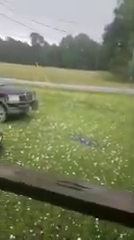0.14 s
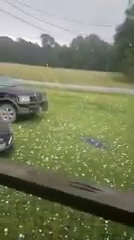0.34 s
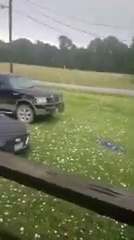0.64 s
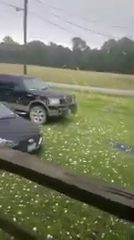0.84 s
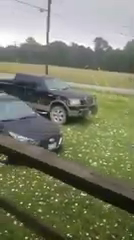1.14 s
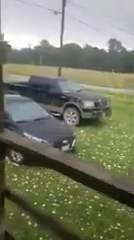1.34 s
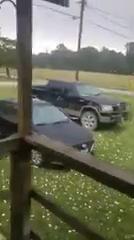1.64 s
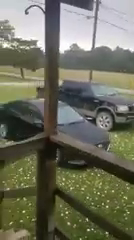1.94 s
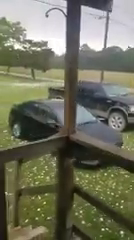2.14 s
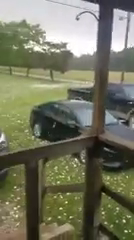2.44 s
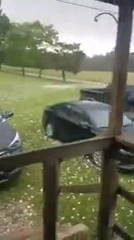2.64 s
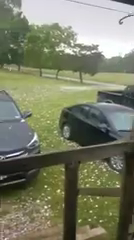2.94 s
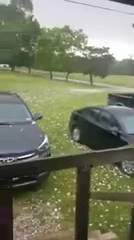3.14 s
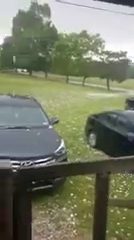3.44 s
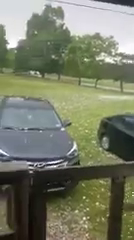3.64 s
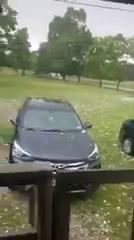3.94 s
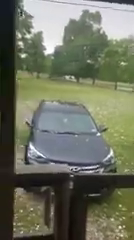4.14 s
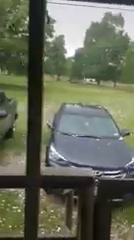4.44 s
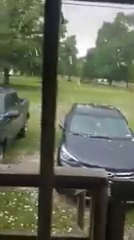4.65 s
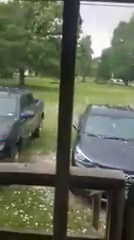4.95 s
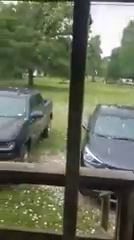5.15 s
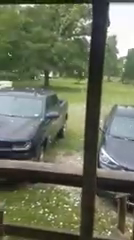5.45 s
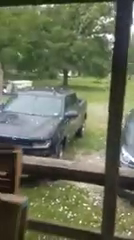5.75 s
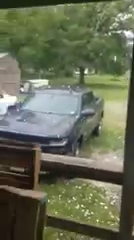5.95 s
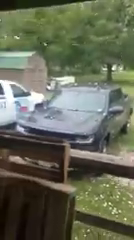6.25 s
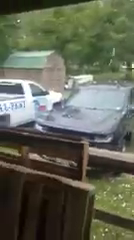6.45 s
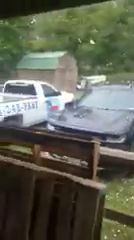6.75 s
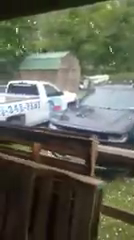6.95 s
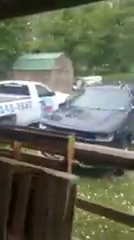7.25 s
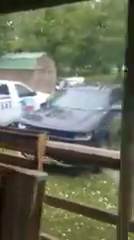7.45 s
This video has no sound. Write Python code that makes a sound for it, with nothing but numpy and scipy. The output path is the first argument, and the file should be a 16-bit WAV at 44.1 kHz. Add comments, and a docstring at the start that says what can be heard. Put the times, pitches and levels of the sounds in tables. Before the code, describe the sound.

A hailstorm is already in full force and never lets up. Loud metallic blows overlap above the listener, some near and sharp, some farther and softer, with short lulls between flurries. Stones patter on cars, steps and gravel outside, and a few thump on the porch's wooden boards or burst into chips. A handheld stereo microphone sits under the roof, catching dull bass, crowded midrange rattle and restrained treble.

```python
"""Hail on a porch roof

Underneath a sheet-metal porch roof: big stones 1 to 10 m away set the sheets rattling, as noise through modes.
Middling stones and small pellets patter between them; rain washes and stones patter in the yard beyond.
Close by, struck spots clack or clang as short modes, stones shatter as sprays of noise, whole sheets boom
on beating low modes and deck boards thud; a faint breeze rumbles on the two microphone ports."""
import sys
import numpy as np
from scipy import signal
from scipy.fft import rfft, irfft, next_fast_len
from scipy.io import wavfile

SR = 44100
rng = np.random.default_rng(int(sys.argv[2]) if len(sys.argv) > 2 else 0)


def transcribe(u):
    """Save the signal u as a 16-bit wav file named by the first command-line argument.

    u: samples, shape (n,) or (channels, n), limited to [-1, 1]; the rate is SR.
    q: integer samples, one column per channel.
    """
    v = np.clip(np.atleast_2d(u).T, -1, 1)
    q = np.round(v * 32767).astype(np.int16)
    wavfile.write(sys.argv[1], SR, q)


N = 335601  # length [samples]


def amp(db):
    """Decibels to gain."""
    return 10 ** (np.asarray(db) / 20)


def evened(x):
    """Scales to rms 1."""
    return x / np.sqrt(np.mean(x ** 2) + 1e-20)


def read(points, hz):
    """Reads (Hz, value) points on a log-frequency axis."""
    f, value = np.transpose(points)
    return np.interp(np.log(hz + 1), np.log(f + 1), value)


def add(mix, s, sound):
    """Lays a stereo sound into the mix at s seconds."""
    part = mix[:, max(round(s * SR), 0):][:, :sound.shape[1]]
    part += sound[:, :part.shape[1]]


def shaped(x, gain):
    """Filters x by gain(Hz)."""
    size = next_fast_len(x.shape[-1] + 2048, True)
    spectrum = rfft(x, size) * gain(np.fft.rfftfreq(size, 1 / SR))
    return irfft(spectrum, size)[..., :x.shape[-1]]


def resonate(x, hz, width_hz):
    """A causal resonance with gain 1 at its centre."""
    return signal.lfilter(*signal.iirpeak(hz, hz / width_hz, SR), x)


def breeze(level_db=-55, edge_hz=90, gust_db=8.0):
    """Moving air rumbles faintly and separately on each microphone port, in slow gusts."""
    gusts = evened(shaped(rng.standard_normal(N), lambda f: np.exp(-f / 2)))
    noise = rng.standard_normal((2, N))
    rumble = evened(shaped(noise, lambda f: f / (1 + (f / edge_hz) ** 2) ** 2))
    return rumble * amp(level_db + gust_db * gusts)


def yard(level_db=-33, swell_db=3.0):
    """Countless distant drops and stones merge into a gently swelling wash."""
    # rain and hail out in the yard: f/Hz, relative level/dB per Hz
    wash_colour = [(15, -47), (25, -34), (244, 8.5), (1070, 0.5), (2260, -8), (5060, -2), (7370, -48),
                   (7990, -31), (8650, -27), (12300, -15), (15200, -28)]
    swell = evened(shaped(rng.standard_normal(N), lambda f: np.exp(-f / 2)))
    wash = evened(shaped(rng.standard_normal((2, N)), lambda f: amp(read(wash_colour, f))))
    return wash * amp(level_db + swell_db * swell)


def patter(per_s=70, level_db=-22, spread_db=4, low_hz=600, high_hz=5400, cycles=45,
           echo_db=-17, echo_t60=0.075, count=48):
    """Stones strike cars, steps and gravel in the yard; every spot answers with its own few short modes."""
    t, out = np.arange(SR // 8) / SR, np.zeros((2, N))
    spots = []
    for hz in np.geomspace(low_hz, high_hz, count):
        modes = hz * rng.uniform(0.677, 1.556, (4, 1))
        ringing = np.sin(2 * np.pi * modes * t) * amp(-60 * t * modes / cycles)
        ring = rng.standard_normal((2, 4)) @ ringing
        echo = evened(resonate(rng.standard_normal((2, len(t))), hz, hz / 2))
        echo = echo * amp(echo_db - 60 * t / echo_t60)
        spots.append(ring / abs(ring).max() + echo)
    for k, (delay, spot, size) in enumerate(rng.random((1500, 3))):
        s = (k + 4 * delay - 2) / per_s
        if 0 < s < N / SR:
            level = amp(level_db + spread_db * (2 * size - 1.5))
            add(out, s, level * spots[int(spot * count)])
    return out


def thuds(level_db=-5, swing_s=0.002, swing_hz=500, echo_db=-14, echo_t60=0.49):
    """A deck board swings in its lowest modes for a few cycles and the porch answers faintly."""
    # stones landing on the wooden deck: t/s, relative level/dB, f/Hz
    deck_hits = [(0.2385, -12, 716), (0.96, -13, 162), (1.164, -13, 593), (1.3797, -4.5, 950),
                 (1.567, -13, 790), (1.569, -10, 336), (1.585, -5, 484), (2.046, -11, 735),
                 (2.130, -4, 630), (2.188, -4.5, 517), (2.351, -11, 680), (3.172, -8, 594),
                 (3.365, -10.5, 207), (3.67, -18, 427), (3.905, -6, 567), (4.345, -13, 586),
                 (4.488, -8, 776), (4.623, -10, 770), (5.162, -7, 503), (5.310, -9, 510),
                 (5.781, -11.5, 780), (5.888, -4, 663), (6.205, -9.5, 300), (6.720, -11, 684),
                 (6.998, -6.5, 690), (7.283, -10.5, 245), (7.297, -9.5, 583), (7.557, -9, 690)]
    # other modes of a board: f/strongest mode [ratio], level/dB against it
    board_modes = [(0.55, -8), (1.6, -11), (2.6, -19)]
    t, out = np.arange(SR // 5) / SR, np.zeros((2, N))
    for s, db, hz in deck_hits:
        age = t / swing_s * np.sqrt(hz / swing_hz)  # higher boards settle sooner
        phase = 2 * np.pi * hz * t
        swing = np.sin(phase) + sum(amp(mode_db) * np.sin(ratio * phase) for ratio, mode_db in board_modes)
        echo = evened(resonate(rng.standard_normal((2, len(t))), hz, hz))
        echo = echo * amp(echo_db - 60 * t / echo_t60)
        add(out, s, amp(db + level_db) * (age * np.exp(1 - age) * swing + echo))
    return out


def splinters(level_db=-1.5, t60=0.077, echo_db=-11, echo_t60=0.36, chips_db=-2.0, chip_s=0.0012):
    """A stone bursts into a spray of chips, and the porch throws the spray back."""
    # ice shattering on the roof's edge and the rail:
    # t/s, relative level/dB, tilt above 1 kHz/(dB per octave), left minus right/dB
    bursts = [(0.312, -21.5, 2, 5), (0.926, -30, 3, 8), (1.064, -30, 1, 4), (1.254, -27, -2, -2),
              (1.332, -21, -1, 1), (1.526, -30, 0.5, 8), (1.571, -19, 0, 7), (1.663, -33, 7, 7),
              (1.764, -24.5, 0, 2), (2.024, -13, -2.5, 5), (2.188, -23, 4, 4), (2.475, -28, 2, 4),
              (2.673, -29, 1, 4), (2.928, -24, 2, 0), (2.972, -27, 3, 6), (3.194, -20, 2, -7),
              (3.668, -19, 1, 4), (3.879, -19, 4, -1), (3.948, -16, 0, 1), (3.975, -16, 0, 0),
              (4.025, -22, 9, 0), (4.345, -19, -3.5, 4), (4.582, -20, 0, -3), (5.108, -28, 5, 6),
              (5.385, -27, 2, 5), (6.204, -14, -5, 2), (6.253, -18, 1, 0), (6.878, -22.5, -1, 5),
              (7.246, -23.5, -3, 6)]
    # colour of breaking ice: f/Hz, relative level/dB per Hz
    ice_colour = [(300, -30), (1500, -8), (3500, 11), (5200, 5), (8500, -9.5), (12500, 1.5), (15200, -7)]
    t, out = np.arange(SR // 5) / SR, np.zeros((2, N))
    for s, db, tilt_db, side_db in bursts:
        def colour(f):
            return amp(read(ice_colour, f) + tilt_db * np.log2(np.maximum(f, 1000)))
        jitter = np.interp(t / chip_s, np.arange(400), rng.uniform(-2, 2, size=400))
        chips = evened(amp(chips_db * jitter))
        spray = evened(shaped(rng.standard_normal((2, len(t))), colour))
        fall = chips * amp(-60 * t / t60) + amp(echo_db - 60 * t / echo_t60)
        sides_db = side_db * np.array([[.5], [-.5]])
        add(out, s, amp(db + level_db + sides_db) * spray * fall)
    return out


def clacks(level_db=-0.5, width_share=0.33, ring_cycles=115, echo_db=-14, echo_t60=0.16,
           core_db=-3, core_cycles=44, contact_cycles=1.3):
    """A solid stone rings one spot for a few cycles; the sheet around it and the porch answer."""
    # stones that clack or clang close by: t/s, relative level/dB, f/Hz
    close_hits = [(0.033, -8, 1820), (0.106, -13, 1370), (0.2368, -1, 3020), (0.240, -9, 1480),
                  (0.722, -8, 1490), (0.836, -13, 2770), (0.964, -12, 2450), (1.1524, -13, 2120),
                  (1.257, -13.5, 3170), (1.445, -13, 1110), (1.527, -17, 4240), (1.67, -18, 3230),
                  (1.745, -17, 1600), (1.8078, -3, 3960), (2.192, -7, 1460), (2.383, -9, 1590),
                  (2.673, -10, 1600), (2.768, -14, 2130), (3.070, -10, 2500), (3.245, -14, 1270),
                  (3.246, -4, 2400), (3.270, -6, 4600), (3.671, -7, 4650), (3.725, -17, 2080),
                  (3.828, -8, 1580), (4.0253, -5, 3230), (4.116, -17, 1390), (4.489, -7, 3450),
                  (4.570, -6, 1520), (4.589, -5, 1420), (4.743, -6.5, 2680), (5.172, -12, 1600),
                  (5.200, -8, 1380), (5.411, -9, 2120), (5.412, -14, 1190), (5.517, -1, 2560),
                  (5.528, -9, 1300), (6.078, -8, 3600), (6.151, -11, 3920), (6.21, -18, 1150),
                  (6.798, -12.5, 1190), (7.066, -21, 2120)]
    # side modes of a struck spot: f/pitch [ratio], level/dB against the pitch
    side_modes = [(1.4, -8), (0.82, -7), (1.62, -4)]
    t, out = np.arange(SR // 5) / SR, np.zeros((2, N))
    for s, db, hz in close_hits:
        turns, width_hz = hz * t, width_share * hz
        fall = amp(-60 * turns / ring_cycles) + amp(echo_db - 60 * t / echo_t60)
        push = rng.standard_normal((2, len(t))) * fall
        answer = resonate(resonate(push, hz, width_hz), hz, 2 * width_hz)
        core = sum(amp(mode_db) * np.sin(2 * np.pi * (ratio * turns + rng.random((2, 1))))
                   for ratio, mode_db in [(1, 0)] + side_modes)
        core *= (1 - np.exp(-turns / contact_cycles)) * amp(-60 * turns / core_cycles)
        answer = amp(level_db) * answer / abs(answer).max()
        core = amp(core_db) * core / abs(core).max()
        add(out, s, amp(db) * (answer + core))
    return out


def booms(level_db=-8.0, count=9, t60=0.14, rise_s=0.005):
    """A sheet's crowded low modes, spread around one pitch, start together and beat as they die."""
    # heavy stones bending a whole sheet: t/s, relative level/dB, f/Hz
    bends = [(0.239, -11, 182), (0.535, -16.5, 270), (0.823, -17, 214), (0.905, -11, 300),
             (1.567, -11, 156), (1.808, -7.5, 158), (2.025, -16, 130), (2.103, -15.5, 175),
             (2.189, -8, 165), (2.836, -10, 221), (3.085, -10, 330), (3.175, -8, 224), (3.400, -9, 195),
             (3.462, -16, 199), (3.675, -15, 230), (3.877, -19, 127), (4.489, -15, 126), (5.635, -10, 216),
             (5.925, -19, 189), (6.085, -18, 150), (6.196, -8.5, 145), (6.337, -18, 185),
             (7.145, -11.5, 264), (7.343, -11, 221)]
    t, out = np.arange(SR // 3) / SR, np.zeros((2, N))
    envelope = (1 - np.exp(-t / rise_s)) * amp(-60 * t / t60)
    for s, db, hz in bends:
        modes = hz * 2 ** ((np.arange(count) + rng.random(count)) / count - .5)
        weights = rng.choice([-1, 1], count) * np.hanning(count + 2)[1:-1]
        boom = weights @ np.sin(2 * np.pi * modes[:, None] * t) * envelope
        add(out, s, amp(db + level_db) * np.array([boom, boom]) / abs(boom).max())
    return out


def small_stones(per_s=260, size_db=2.0, tick_t60=0.017, tail_t60=0.51, tail_db=-13,
                 bright_hz=7000, count=32, treble_lift=0.062):
    """Random pellets: each ticks on the metal and leaves a faint rattle."""
    t, out = np.arange(SR // 6) / SR, np.zeros((2, N))
    size = amp(size_db * np.minimum(rng.exponential(1, N), 2)) * (rng.random(N) < per_s / SR)
    spots = rng.integers(0, count, N)
    fall = amp(-60 * t / tick_t60) + amp(tail_db - 60 * t / tail_t60)
    for spot in range(count):
        tap = rng.standard_normal((2, len(t))) * fall
        for at in np.flatnonzero(size * (spots == spot)):
            add(out, at / SR, size[at] * tap)
    # light pellets make brief contact, so they sound brighter than big stones
    return shaped(evened(out), lambda f: 1 + treble_lift * f / (f + bright_hz))


def middling_stones(per_s=12, level_db=-24, spread_db=3, bright_level_db=-0.5, metres=5.2,
                    lull_s=0.11, lull_db=-6):
    """Stones farther along the roof, one at random around each equal stretch of time, lighter in the lulls."""
    # lulls between flurries: t/s
    lulls = [0.48, 1.26, 1.48, 2.44, 3.52, 4.26, 5.04]
    place, size, hardness = rng.uniform(-1, 1, (150, 3)).T
    s = (np.arange(len(place)) + place / 2) / per_s
    lull = sum(np.exp(-(2 * (s - at) / lull_s) ** 2) for at in lulls)
    db = level_db + spread_db * size + lull_db * lull
    bright_db = bright_level_db + spread_db * hardness
    return np.c_[s, db, bright_db, np.full(len(s), metres)][s < N / SR]


def blows(stones, hold=1.39, ripple_db=7.0, mode_gap_hz=45, thump_edge_hz=720, bright_edge_hz=2900,
          crack=0.13, crack_s=0.018, crack_growth=0.37, arrivals_per_s=4000, crowding_s=0.02,
          tint_db=2.5, tint_gap_hz=1000, release_s=0.22, swell_share=0.24, swell_s=0.01, ring_size=24576):
    """Each blow cracks, sets the sheets' modes rattling, holds up a moment and dies away, the treble first."""
    # how the sheets take a blow: f/Hz, level/dB, factor on the ring time [ratio], rise time/s
    sheet = [(90, 3, 2.8, 0.0019), (244, 0, 1.17, 0.00046), (576, -1, 1.01, 0.0018), (1210, 0, 1.1, 0.0015),
             (2150, 1, 1.03, 0.00043), (3830, 3.5, 0.76, 0.0026), (6200, 2, 0.62, 0.0007),
             (12200, 2.5, 0.58, 0.00069)]
    typical_db, typical_m, ring_t60_s = -15, 3.12, 0.43  # a typical big stone, before the bands' factors
    # heavy or far stones ring longer, hard and bright ones die sooner
    ring_growth_per_db, ring_distance_power, ring_loss_per_bright_db = 0.2362, 1.01, 0.03
    # heavy or near stones thump more
    thump_db_per_db, thump_db_per_halved_distance = 0.07, 1.5
    rise_distance_power = 1.77  # far blows take longer to swell

    hz, band_db, ring, rise = np.transpose(sheet)[:, :, None]
    t, f = np.arange(ring_size) / SR, np.fft.rfftfreq(ring_size, 1 / SR)
    shares = np.array([read(np.c_[hz, share], f) for share in np.eye(len(hz))], np.float32)
    low = 1 / (1 + (hz / thump_edge_hz) ** 4)
    high = 1 / (1 + (bright_edge_hz / hz) ** 4)
    burst = crack * np.exp(-t / crack_s)
    swell = 1 - swell_share * (1 - high) * np.exp(-t / swell_s)  # the body fills in after the first edge
    release = np.minimum((t[-1] - t) / release_s, 1)
    # separate wavefronts at first, then a crowd
    density = np.minimum(arrivals_per_s * (1 + t / crowding_s) / SR, 1)
    ripple = ripple_db * f / (f + 600)  # long waves hardly depend on where the stone lands
    out = np.zeros((2, N))
    for s, db, bright_db, metres in stones:
        weight_db, far = db - typical_db, max(metres / typical_m, .3)
        thump_db = thump_db_per_db * weight_db - thump_db_per_halved_distance * np.log2(far)
        t60 = ring_t60_s * far ** ring_distance_power
        t60 *= np.exp(ring_growth_per_db * weight_db - ring_loss_per_bright_db * bright_db)
        # every spot of the roof drives its own choice of the crowded modes
        modes = np.minimum(rng.standard_normal(size=1000), 1)  # some sit on a node, none towers over the rest
        spot = evened(amp(ripple * np.interp(f / mode_gap_hz, np.arange(len(modes)), modes)))
        # and favours a few broad regions of the treble
        tint = rng.uniform(-1.07, 1, size=32)
        regions = np.interp(f / tint_gap_hz, np.arange(len(tint)), tint)
        spot = evened(spot * amp(tint_db * f / (f + tint_gap_hz) * regions))
        arrives = rng.random((2, ring_size)) < density
        waves = rng.standard_normal((2, ring_size)) * arrives / np.sqrt(density)
        vibration = (rfft(waves) * spot).astype(np.complex64)
        bands = irfft(shares[:, None] * vibration)
        # the level holds up for a moment before it falls
        age = (t * np.log(1000) / (t60 * ring)).astype(np.float32)
        fall = np.exp(-np.minimum(age, 20)) * np.sqrt(1 + 2 * hold * age) * release
        # blows from far spots arrive gradually; near, bright stones crack the most
        attack = 1 - np.exp(-t / (rise * far ** rise_distance_power))
        onset = attack * swell * (1 + burst / far * amp(crack_growth * bright_db))
        gain = amp(db + band_db + thump_db * low + bright_db * high)
        envelope = (gain * onset * fall).astype(np.float32)
        add(out, s, np.einsum("bt,bct->ct", envelope, bands))  # sum of the bands
    return out


def roof(big_db=-1.22, small_db=-28):
    """All the blows take on the colour and the ringing modes of the sheet metal."""
    # big stones overhead: t/s, relative level/dB, brightness/dB, distance/m
    big_stones = [(0.0, -19.5, -3, 3.1), (0.032, -13.5, -1.5, 2.05), (0.106, -15, -3, 5),
                  (0.19, -18, -3, 5.4), (0.236, -13.5, 3.5, 2.4), (0.336, -15, 1.5, 3.3),
                  (0.522, -14, 1.5, 3.2), (0.699, -14, -2, 5.7), (0.831, -14.5, 0.5, 3.5),
                  (0.906, -16, -2, 9.9), (0.965, -16.5, 3.5, 2.1), (1.06, -18, -11, 4.4),
                  (1.154, -19, -8.5, 2), (1.333, -15.5, -2, 4.3), (1.373, -17, -11, 3.6),
                  (1.408, -17, -9, 2.3), (1.526, -19, -3, 2.4), (1.568, -12.5, -0.5, 1.26),
                  (1.668, -18, -11, 3.6), (1.742, -21.5, 0, 3), (1.808, -12.5, -3.5, 2.35),
                  (1.909, -15.5, 3.5, 3), (2.022, -14, -3, 3.8), (2.189, -13, 3, 2.34),
                  (2.302, -16, 5.5, 5.7), (2.474, -22, 3, 7.7), (2.54, -20.5, -16, 2), (2.56, -15, -4, 5.6),
                  (2.587, -19, 5, 4.9), (2.673, -16, -21, 1.4), (2.715, -15, 2.5, 3.8),
                  (2.764, -14, 1, 4.6), (2.928, -14, -3, 2.5), (2.972, -16.5, 3, 3.6), (3.065, -12.5, 0, 4),
                  (3.179, -17.5, 2.5, 3.8), (3.24, -15.5, 2.5, 3), (3.266, -15.5, 5.5, 3.7),
                  (3.373, -14.5, 2, 2.3), (3.419, -14, 0, 1.9), (3.571, -17.5, -5, 4.2),
                  (3.667, -12.5, -1.5, 1.87), (3.827, -14.5, 0, 5), (3.877, -12, 0.5, 2.3),
                  (3.973, -15, 3.5, 3.4), (4.113, -16, 0, 4.1), (4.32, -22, 4, 4.5),
                  (4.341, -14.5, -3, 2.3), (4.43, -17, -9, 2.3), (4.487, -15.5, 5, 4),
                  (4.568, -13, -4.5, 3.3), (4.733, -15, -2, 2.2), (4.873, -15.5, -6, 3.2),
                  (4.896, -18, -2, 4.1), (5.106, -16.5, 2, 3.9), (5.16, -14, -5, 2.8),
                  (5.195, -13, -2, 2.15), (5.313, -14.5, -13, 3.5), (5.333, -24, 4, 4.4),
                  (5.41, -11.5, 0, 1.03), (5.515, -12.5, -1.5, 1.6), (5.579, -14, 1.5, 3.1),
                  (5.721, -16, -5.5, 9.1), (5.84, -14, 0, 1.8), (5.894, -12, -1, 1.95),
                  (6.077, -15.5, 3.5, 2.5), (6.148, -19, 3.5, 5.5), (6.201, -12, 1.5, 1.8),
                  (6.25, -19, 2, 3.3), (6.343, -14, -1, 4.5), (6.424, -16.5, 2, 6.6),
                  (6.503, -14.5, -1.5, 4.7), (6.696, -15, -0.5, 3.4), (6.806, -18, -10, 6.4),
                  (6.935, -20, -15, 3.2), (6.97, -14, -5.5, 2.7), (7.055, -18, 3, 6.6),
                  (7.12, -14.5, -3, 3.3), (7.282, -15.5, 1, 3.8), (7.337, -15, 5, 2.4),
                  (7.39, -16, -1.5, 6.6), (7.529, -15.5, -1.5, 7.1)]
    # ice on the roof: f/Hz, relative level/dB per Hz
    metal_colour = [(15, -50), (25, -29.5), (163, -4), (238, -1), (328, -1.5), (734, 1.3), (1070, -3.5),
                    (1400, -0.9), (2260, -2), (4200, -10.5), (5060, -11.5), (7370, -23), (8200, -31),
                    (12600, -23), (15200, -30)]
    # ringing modes of the sheets: f/Hz, width/Hz, level/dB over the rattle
    roof_modes = [(104, 46, -13.5), (158, 16, -12), (248, 31, -10.5), (770, 55, -22), (978, 89, -11),
                  (1360, 95, -15.5), (1580, 67, -16), (2320, 240, -13.5), (5010, 720, -10),
                  (7250, 720, -2.5)]
    hail = amp(big_db) * blows(big_stones) + amp(small_db) * small_stones() + blows(middling_stones())
    rattle = shaped(hail, lambda f: evened(amp(read(metal_colour, f))))
    return rattle + sum(amp(db) * resonate(rattle, hz, width) for hz, width, db in roof_modes)


def microphones(x):
    """Two close ports share the bass and hear the treble separately."""
    # how alike the two ports hear: f/Hz, left-right likeness [-1 to 1]
    port_likeness = [(60, .7), (125, .82), (230, .84), (400, .6), (620, .45), (950, .03), (1600, -.17),
                     (3000, 0), (14000, .06)]
    # balance of the two ports: f/Hz, left minus right/dB
    port_balance = [(60, -1), (110, -0.5), (200, 0), (380, 0), (700, 0.5), (1290, -3.5), (2380, -4.0),
                    (4400, -3), (8120, 0.5), (15000, 5.5)]

    def apart(f):
        likeness = np.clip(read(port_likeness, f), -.9, .98)
        return np.sqrt((1 - likeness) / (1 + likeness))
    mid = (x[0] + x[1]) / 2
    side = shaped((x[0] - x[1]) / 2, apart)
    return np.array([shaped(mid + sign * side, lambda f: amp(sign * read(port_balance, f) / 2))
                     for sign in (1, -1)])


def scene():
    """Yard, near blows and roof reach the ports together; the breeze blows on the ports themselves."""
    far = yard() + patter()
    near = thuds() + splinters() + clacks() + booms()
    return breeze() + microphones(far + near + roof())


def record(dry, notch_hz=8100, notch_width_hz=500, notch_depth=0.17, knee=0.94, edge_hz=15600):
    """A narrow dip in the microphone's treble, rounded peaks, and the band limit."""
    x = dry - notch_depth * resonate(dry, notch_hz, notch_width_hz)
    below = np.clip(x, -knee, knee)
    x = below + (1 - knee) * np.tanh((x - below) / (1 - knee))
    lowpass = signal.firwin(401, edge_hz, window=("kaiser", 8), fs=SR)
    return signal.oaconvolve(x, lowpass[None], "same")


dry = scene()
out = record(dry)
transcribe(out)
```